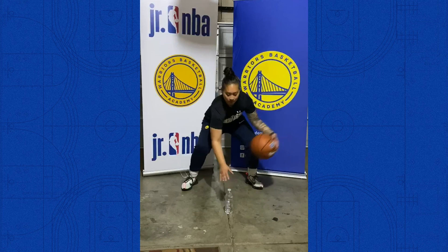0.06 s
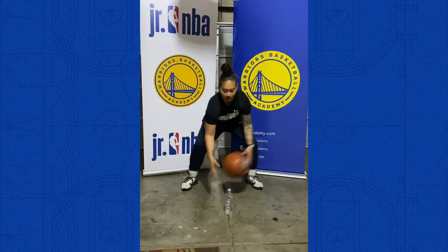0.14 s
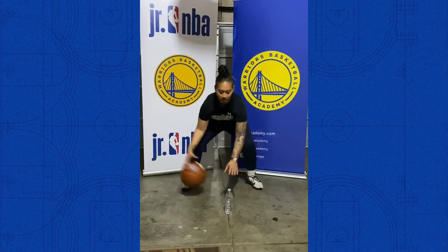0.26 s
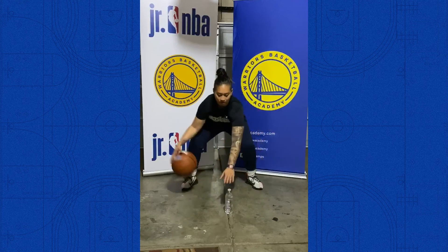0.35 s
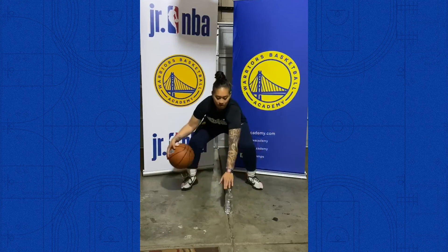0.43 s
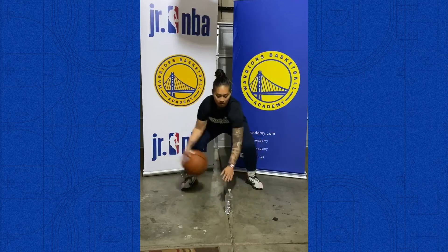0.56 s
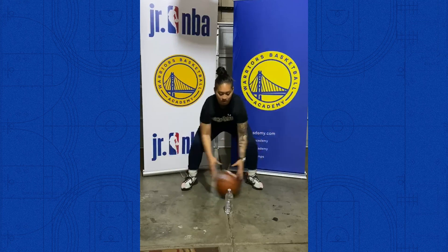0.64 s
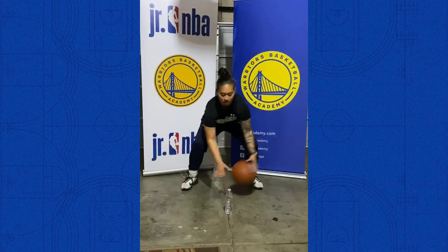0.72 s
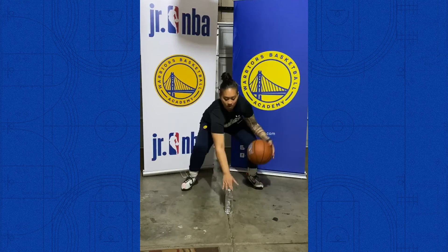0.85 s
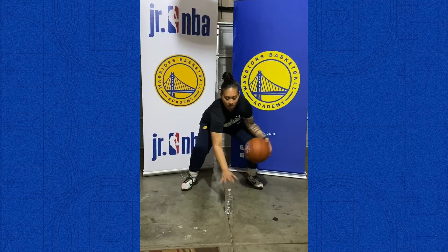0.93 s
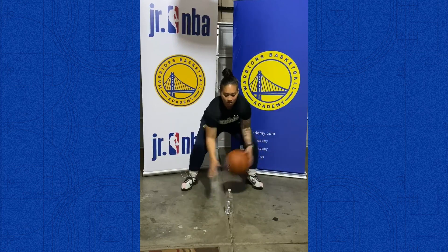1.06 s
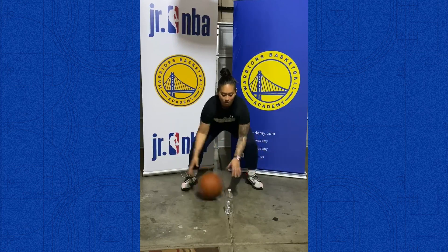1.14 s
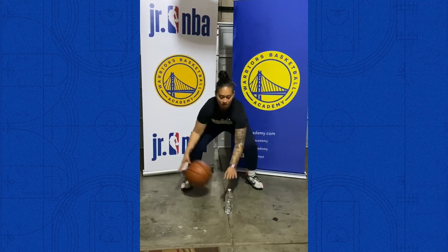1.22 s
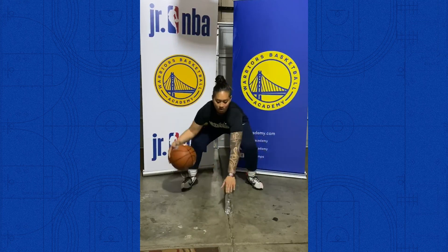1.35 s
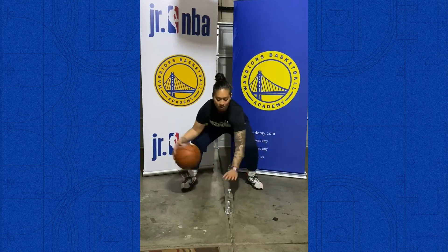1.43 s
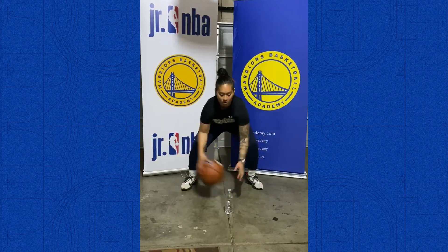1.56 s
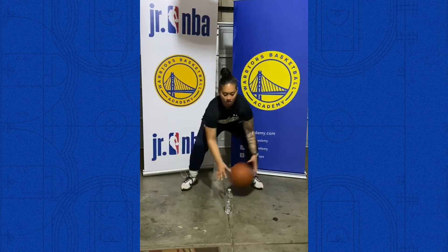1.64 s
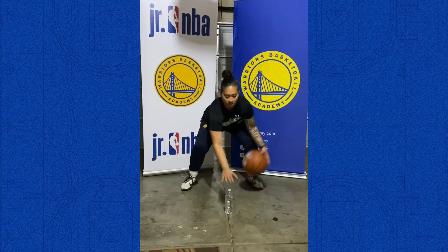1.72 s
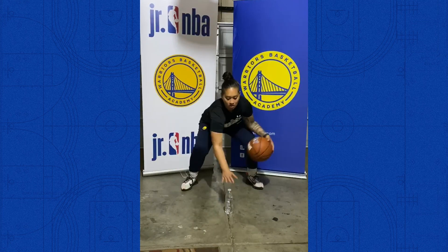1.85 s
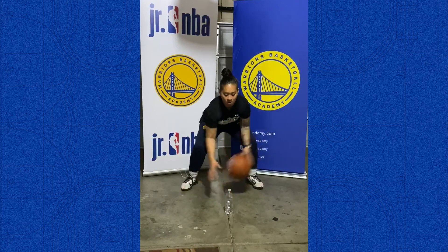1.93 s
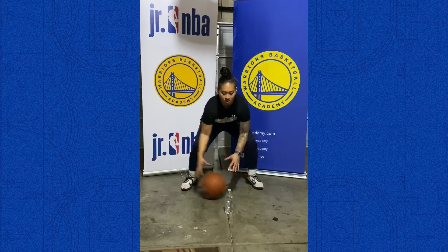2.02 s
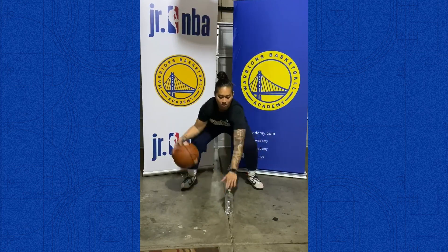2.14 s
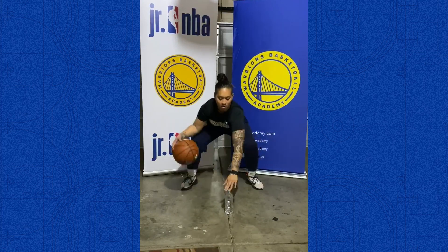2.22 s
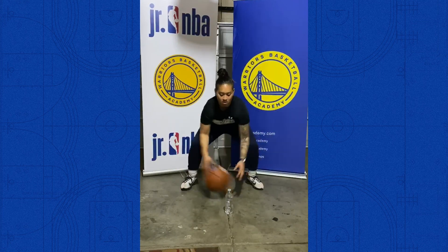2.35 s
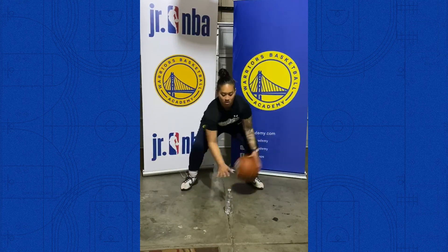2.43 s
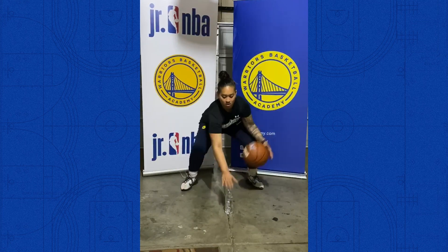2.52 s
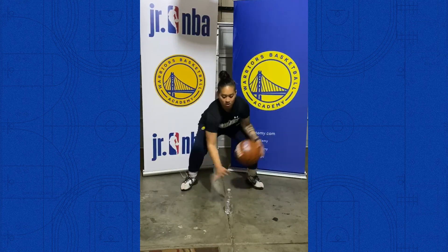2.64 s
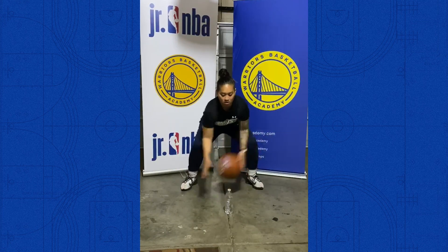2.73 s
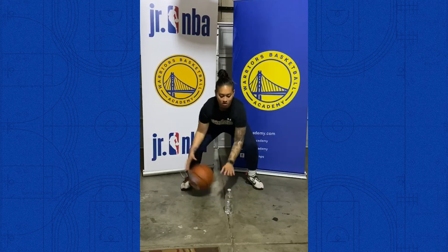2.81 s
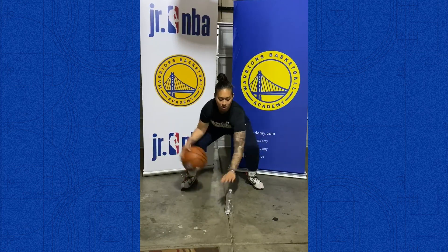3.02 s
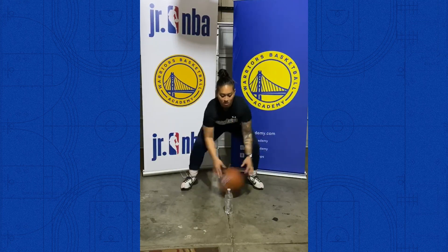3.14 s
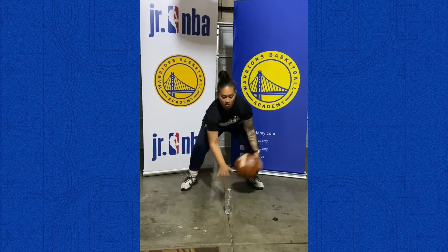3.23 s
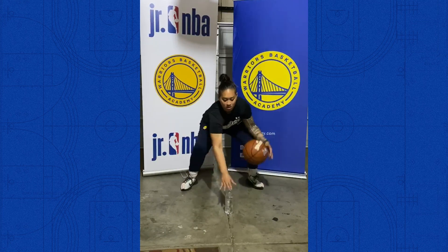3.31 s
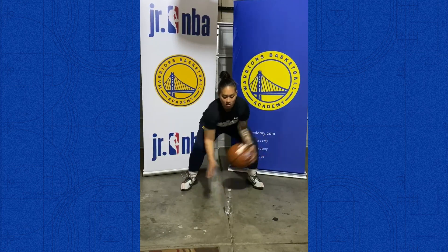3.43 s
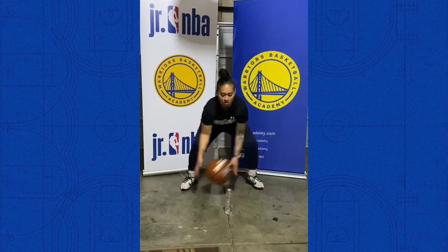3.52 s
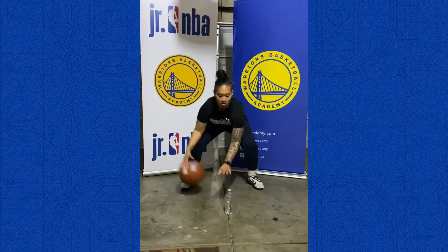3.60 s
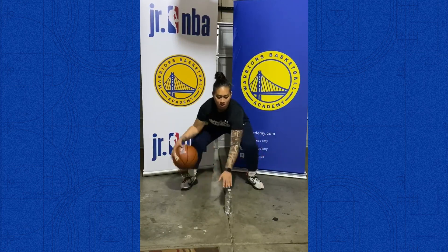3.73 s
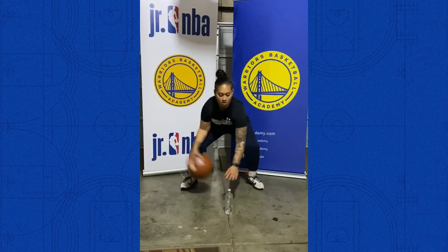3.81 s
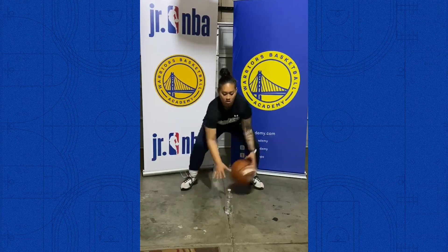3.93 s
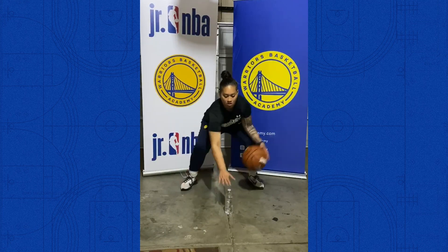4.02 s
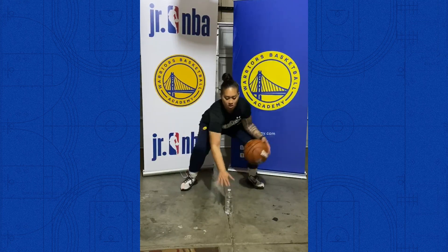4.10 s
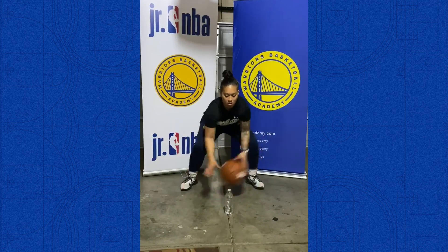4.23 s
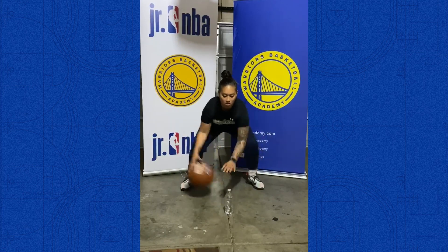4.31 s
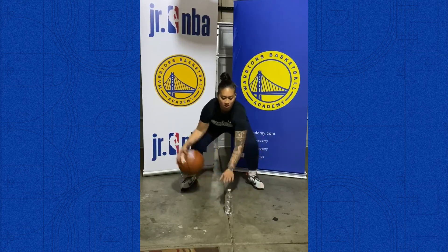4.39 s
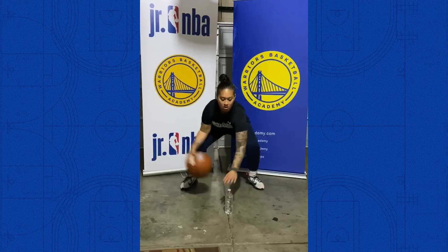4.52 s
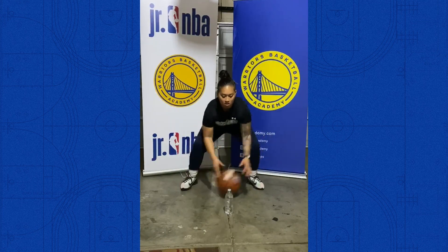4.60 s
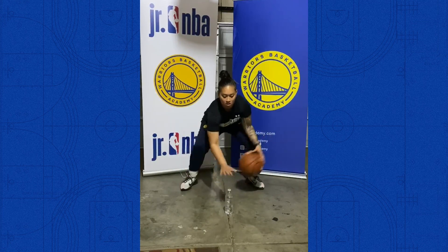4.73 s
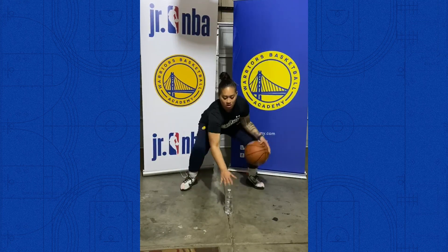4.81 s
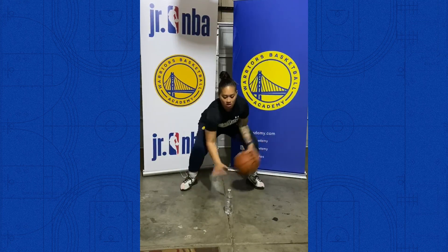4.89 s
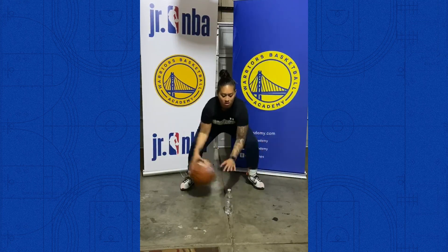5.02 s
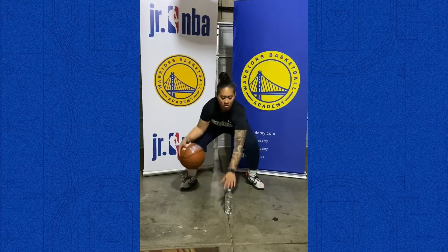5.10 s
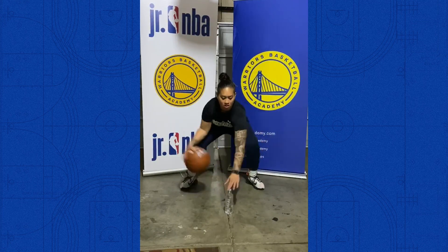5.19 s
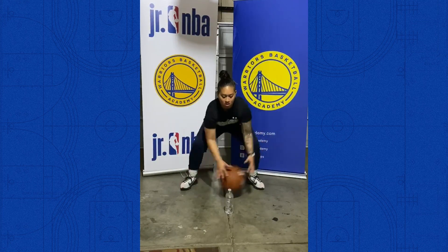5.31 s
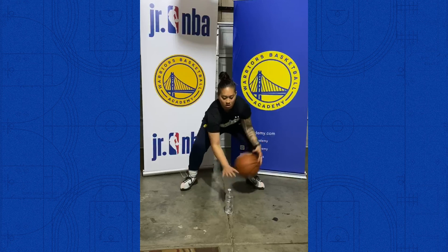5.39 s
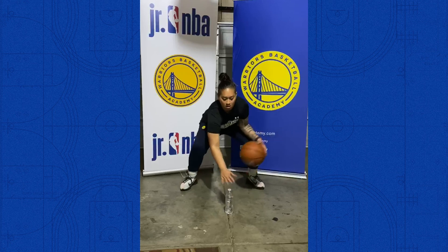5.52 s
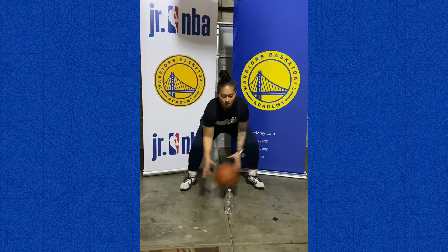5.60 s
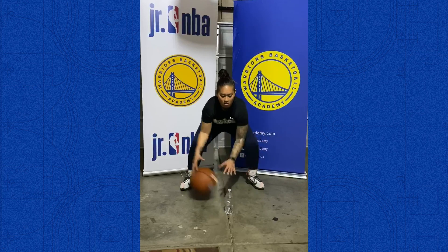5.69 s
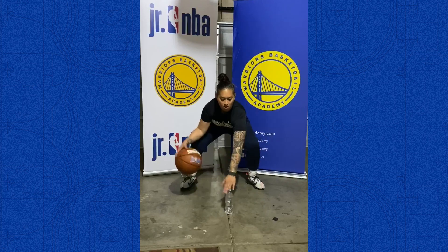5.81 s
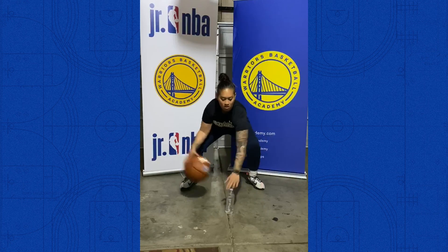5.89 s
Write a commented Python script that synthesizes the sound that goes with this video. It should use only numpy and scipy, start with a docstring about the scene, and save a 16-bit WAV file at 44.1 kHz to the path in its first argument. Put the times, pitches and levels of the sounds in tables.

```python
"""In a large hall with a concrete floor, a basketball is dribbled hard from hand to hand onto two spots in turn.
Each bounce is a crack and smack of filtered noise, a sine slap falling in pitch, and a thud of short pulses.
Decaying sines swell as the low resonances of a corner and ring as the air in the ball; noise is the hall's tail.
Palms tap the ball (noise bursts), ventilation rumbles (shaped noise) and mains hums (steady sines).
A small stereo microphone rounds off the loudest swings."""
import sys
import numpy as np
from scipy import signal
from scipy.fft import rfft, irfft, next_fast_len
from scipy.io import wavfile

SR = 44100
rng = np.random.default_rng(int(sys.argv[2]) if len(sys.argv) > 2 else 0)


def to_wav(sig):
    """Store sig (one row per channel, or 1-D mono) as 16-bit WAV at the path in sys.argv[1].

    Samples outside -1..1 are clipped; the rate is SR.
    """
    pcm = np.clip(np.atleast_2d(sig), -1, 1) * 32767
    pcm = np.round(pcm).astype(np.int16)
    wavfile.write(sys.argv[1], SR, pcm.T)  # frames by channels


N = 262395
TIME = np.arange(N) / SR
AGE = TIME[:SR]   # time since a blow, s


def from_db(db):
    """Level to amplitude: 20 dB is a factor of ten."""
    return 10 ** (np.asarray(db) / 20)


def rms_one(x):
    """Normalisation to unit root-mean-square amplitude."""
    return x / np.sqrt(np.mean(x ** 2) + 1e-20)


def at_hz(points, hz):
    """Linear interpolation of every column of a table on a log-frequency axis."""
    freqs, *columns = np.transpose(points)
    return [np.interp(np.log(hz), np.log(freqs), column) for column in columns]


def fade(t60):
    """Exponential decay: the level falls 60 dB in t60 seconds."""
    return from_db(-60 * AGE / t60)


def bump(hz, centre_hz, octaves):
    """Resonance-like weighting: a bell of height 1 on a log-frequency axis."""
    return np.exp(-(np.log2(hz / centre_hz) / octaves) ** 2)


def puff(hz, t60):
    """Heavily damped oscillation: a few swings of air rise within a cycle and die at once."""
    return np.sin(2 * np.pi * hz * AGE) * (1 - np.exp(-AGE * hz)) * fade(t60)


def band(x, low_hz, high_hz):
    """Band-pass filtering: only the range between two frequencies is kept."""
    sos = signal.butter(2, [low_hz, min(high_hz, .45 * SR)], "band", fs=SR, output="sos")
    return signal.sosfilt(sos, x)


def add(track, s, sound):
    """Superposition: a sound is mixed in from time s on."""
    start = max(round(s * SR), 0)
    part = sound[..., :max(N - start, 0)]
    track[..., start:start + part.shape[-1]] += part


# likeness of diffuse sound in the two channels: f/Hz, correlation [0-1]
LIKENESS = [(120, 1), (300, 0.99), (480, 0.57), (700, 0.12), (1000, 0.01), (1800, 0.78), (2600, 0.3),
            (4500, 1), (7000, 1), (16000, 1)]


def diffuse_bands():
    """Diffuse field: third-octave noise from all sides, its channels correlated by frequency; (Hz, noise)."""
    white = rng.standard_normal((2, 2, N))
    edges = 40 * 2 ** (np.arange(27) / 3)
    bands = []
    for k, (low, high) in enumerate(zip(edges, edges[1:])):
        hz = np.sqrt(low * high)
        mid, side = band(white[k % 2], low, high)
        alike = np.clip(at_hz(LIKENESS, hz)[0], 0, 1)
        stereo = np.sqrt(1 + alike) * mid + np.sqrt(1 - alike) * np.array([side, -side])
        bands.append((hz, rms_one(stereo)))
    return bands


# spectrum of the ventilation: f/Hz, relative spectral level/dB [per Hz]
VENT_SPECTRUM = [(30, -26), (59, -2), (90, -43), (150, -2.5), (210, -24.5), (295, -15.5), (473, -26.5),
                 (700, -34), (2900, -46), (5200, -53.5), (7300, -65), (11000, -58.5), (16000, -77)]
# steady mains hum: f/Hz, level/dB [rms]
MAINS_HUM = [(60, -40.5), (120, -44.5)]


def ventilation(air_db):
    """Broadband flow noise: steady air rumble, with a mains hum of pure tones."""
    # the power in a third-octave band grows with its width, hence with frequency
    air = sum(from_db(at_hz(VENT_SPECTRUM, hz)[0]) * np.sqrt(hz) * noise for hz, noise in diffuse_bands())
    hum = np.zeros(N)
    for hz, db in MAINS_HUM:
        hum += from_db(db) * np.sqrt(2) * np.sin(2 * np.pi * (hz * TIME + rng.random()))
    return from_db(air_db) * rms_one(air) + hum


# bounces, on the two spots in turn; levels are relative;
# direct is added to the crack (and its near echoes) and to the smack, not to the hall's tail:
#   t/s, thump level/dB, slap level/dB, slap mid-glide f/Hz, slap t60/s, crack level/dB, body level/dB,
#   knock level/dB, bite level/dB, smack level/dB, direct level/dB, flattening level/dB
BOUNCES = [(0.2431, -1.5, -0.4, 1416, 0.011, 1.5, 1, 8, 0.5, -2.5, -0.5, 4),
           (0.666, -2.5, -6.5, 1600, 0.01, -6, 1, 6, 5, 4, -2, -3),
           (1.164, -1, -2, 1540, 0.0088, 2, 2, 8.5, -0.5, 2.5, 3, -3),
           (1.6157, 1, 0, 1315, 0.014, 3, 2, 5, -5, -5.5, -7, -6),
           (2.0257, -0.9, 1.5, 1510, 0.0047, 7.5, 1, 4, -2, -1.5, 0, -12),
           (2.3886, 0, 0.5, 1185, 0.019, -6.5, 3.5, 7, 0, 1, -6.5, -4),
           (2.7956, -0.3, -0.7, 1600, 0.015, 6.5, 4, 10, 2.5, 4.5, 1.5, 1.5),
           (3.14, 1, 0.7, 1190, 0.012, -3, 2.5, 5.5, 1, -3.5, -4, -8),
           (3.576, 1.7, -1.5, 1590, 0.016, 2, 2, 12.5, 1.5, 2, -1, 2),
           (3.9039, -1.1, -0.8, 1750, 0.0063, -3.5, 5.5, 6, -1.5, -3, -6.5, -8),
           (4.278, -1.5, 1.5, 1510, 0.018, 0, 2.5, 8, -8, 3, 0, -9),
           (4.616, -1, 2.5, 1183, 0.0069, -2, 1, 2.5, -4.5, -2.5, -3.5, -1),
           (4.973, 0.5, 4.5, 1470, 0.0071, 6, 0, 3, -2, 3, 1, -13),
           (5.3, -1.5, 0.5, 1390, 0.015, -2, 0.5, 7, -8.5, 4.5, -4.5, -2),
           (5.6677, 0.4, 0.5, 1580, 0.023, -2, -2.5, 9.5, -5, 6, -2.5, -8)]
# slap and crack come back from the player and the banners: mean delay t/s, relative level/dB
NEAR_ECHOES = [(.0021, -10), (.0045, -9.5), (.0103, -13.5), (0.0172, -12.5)]


def impact(slap_level_db, glide, glide_s, crack_level_db, crack_t60, crack_low_hz, crack_high_hz, wander):
    """Contact radiation: pebbled skin cracks on concrete; the slap drops in pitch as the ball flattens."""
    out = np.zeros(N)
    for s, _, slap_db, slap_hz, slap_t60, crack_db, *_, direct_db, _ in BOUNCES:
        pitch = slap_hz * (1 + glide * (np.exp(-AGE / glide_s) - .5))
        slap = np.sin(2 * np.pi * np.cumsum(pitch) / SR) * fade(slap_t60)
        crack = rms_one(band(rng.standard_normal(SR), crack_low_hz, crack_high_hz)) * fade(crack_t60)
        hit = from_db(slap_level_db + slap_db) * slap
        hit += from_db(crack_level_db + crack_db + direct_db) * crack
        add(out, s, hit)
        for delay, db in NEAR_ECHOES:
            # the paths change as the player sways
            swayed_delay = delay * (1 + wander * rng.standard_normal())
            add(out, s + swayed_delay, from_db(db) * hit)
    return out


# the bright colours of a contact: centre, half-width of the bell
BITE_HZ, BITE_OCTAVES = 3240, 0.43
SMACK_HZ, SMACK_OCTAVES = 5600, 0.3


def smack(level_db, t60):
    """Air expulsion: air squeezed out from under the pebbled skin gives a crisp burst of noise."""
    out = np.zeros(N)
    for s, _, slap_db, *_, bite_db, smack_db, direct_db, _ in BOUNCES:
        for hz, db in ((BITE_HZ, bite_db), (SMACK_HZ, smack_db)):
            third = 2 ** (1 / 3)   # a third of an octave to either side
            burst = rms_one(band(rng.standard_normal(SR), hz / third, hz * third))
            add(out, s, from_db(level_db + slap_db / 2 + direct_db + db) * burst * fade(t60))
    return out


# the two landing spots: time for the corner's resonances to swell t/s, thump f/Hz
SPOTS = [(0.0129, 227.7), (0.015, 160.6)]
# the thump arrives directly, then in bunches from the walls of the corner; one list per spot:
#   delay t/s, thump relative level/dB, bass relative level/dB
THUMP_PATHS = [
    [(0, -11.5, -4), (0.0069, 2, 4.5), (0.0183, -0.5, -14), (0.0219, 2, -2), (0.0363, -2.5, -1.5),
     (0.049, -8.5, -2), (0.069, -16.5, -28), (0.0977, -1.5, -1), (0.1197, -2.5, -2), (.153, -11, -14)],
    [(0, -12, -17), (0.0079, -0.5, -10), (0.0203, 1.5, 4), (0.0291, 3, -12), (0.0379, -8, -3.5),
     (0.048, -6.5, -13), (0.0696, -5, -35), (.096, -9, -14), (.122, -9, -17)],
]


def thump(level_db, t60, vary_db, bass_db, bass_hz, bass_t60, hollow_db, hollow_hz, hollow_t60):
    """Volume displacement: the flattening ball shoves air aside; walls return the pulse as an uneven thud."""
    out = np.zeros(N)
    bass = from_db(bass_db) * puff(bass_hz, bass_t60)
    hollow = from_db(hollow_db) * puff(hollow_hz, hollow_t60)
    for k, (s, thump_db, _, _, _, _, body_db, *_) in enumerate(BOUNCES):
        spot = k % 2   # the ball crosses over on every bounce
        pulse = puff(SPOTS[spot][1], t60) + from_db(body_db) * hollow
        for delay, db, low_db in THUMP_PATHS[spot]:
            gain = from_db(level_db + thump_db + vary_db * rng.standard_normal())
            add(out, s + delay, gain * (from_db(db) * pulse + from_db(low_db) * bass))
    return out


# the hollow body colour of a contact, below the knock at the slap's pitch
BODY_HZ, BODY_OCTAVES = 462, 0.4
# low resonances of the corner: nominal f/Hz, t60/s, relative level/dB from spot 1, relative level/dB from spot 2
CORNER = [(62.8, 0.46, -14.5, -11), (85.6, 0.72, -26, -29), (112.5, 0.12, -1, -22), (120.34, 1, -24, -21),
          (152.9, 0.57, -12.5, -19), (178.4, 0.36, -16, -19), (217.6, 0.39, -11.5, -10),
          (242.4, 0.51, -13.5, -20), (272.2, 0.43, -8, -15.5), (301.2, 0.56, -14.5, -15.5),
          (337, 0.37, -17.5, -17), (445, 0.5, -19.5, -25), (476.3, 0.66, -21, -24),
          (540.8, 0.62, -29, -31.5)]


def boom(level_db, vary_db, detune, apart_hz):
    """Modal excitation: the thump pumps the corner's resonances, at a rate and level set by the spot."""
    out = np.zeros((2, N))
    chance = rng.standard_normal((len(BOUNCES), len(CORNER), 3))
    for k, ((s, thump_db, _, _, _, _, body_db, *_), draws) in enumerate(zip(BOUNCES, chance)):
        spot = k % 2
        swell = 1 - np.exp(-(AGE / SPOTS[spot][0]) ** 2)
        for (hz, t60, *spot_db), (louder, higher, across) in zip(CORNER, draws):
            # shorter waves differ more from bounce to bounce and from one channel to the other
            spread = (hz / apart_hz) ** 2
            mode_hz = hz * (1 + detune * spread * higher)
            phase = 2 * np.pi * mode_hz * AGE + spread * across * np.array([[1], [-1]])
            blow_db = thump_db + body_db * bump(hz, BODY_HZ, BODY_OCTAVES) + vary_db * louder
            gain = from_db(level_db + blow_db + spot_db[spot])
            add(out, s, gain * swell * fade(t60) * np.sin(phase))
    return out


# the air inside the ball: f/Hz, relative level/dB, t60/s
BALL_AIR = [(852, -38, 0.4), (990, -37, 0.41), (1295, -38, 0.79), (1490, -37, 0.45), (2100, -40, 0.65),
            (2220, -38, 0.49), (3130, -53, 0.32)]


def ball_ring(level_db, vary_db):
    """Cavity resonance: the enclosed air pings on, with its own strength and phase in each channel."""
    out = np.zeros((2, N))
    for s, _, slap_db, *_ in BOUNCES:
        for hz, db, t60 in BALL_AIR:
            gain = from_db(level_db + slap_db + db + vary_db * rng.uniform(-0.75, 1, (2, 1)))
            phase = 2 * np.pi * rng.random() + rng.standard_normal((2, 1))
            add(out, s, gain * np.sin(2 * np.pi * hz * AGE + phase) * fade(t60))
    return out


# the hall's answer to a bounce: f/Hz, early scatter relative level/dB [per octave],
#   tail relative level/dB [per octave], tail t60/s
HALL = [(50, -46, -30.5, 0.82), (117, -25, -22, 0.61), (270, -35, -16, 0.91), (448, -19.5, -21, 0.75),
        (837, -16.5, -23, 0.7), (1230, -26, -25, 0.77), (1690, -48, -31, 0.78), (2130, -32, -28, 0.69),
        (3380, -25, -27.5, 0.7), (4430, -35, -34.5, 0.7), (5550, -45, -33, 0.66), (6940, -22, -43, 0.62),
        (10460, -63, -30, 0.48), (15300, -42, -43.5, 0.24)]


def hall_decay(hz, early_t60, build_s, build_cycles):
    """Double-slope decay: a quick scatter, then the tail of a third-octave band; lows build up later."""
    early_db, tail_db, t60 = at_hz(HALL, hz)
    decay = np.hypot(from_db(early_db) * fade(early_t60), from_db(tail_db) * fade(t60))
    build_up = 1 - np.exp(-AGE / (build_s + build_cycles / hz))
    return decay * build_up / np.sqrt(3)   # a third of an octave's power


def hall(knock_octaves, grain, grain_t60, grain_apart, clump_db, clump_s, colour_t60, late_colour):
    """Reverberation: each bounce fills the hall with its own colour, which evens out as the tail dies."""
    bands = []
    for hz, noise in diffuse_bands():
        bands.append((hz, noise, hall_decay(hz, early_t60=0.11, build_s=0.0027, build_cycles=0.67)))
    out, fresh = np.zeros((2, N)), fade(colour_t60)
    for s, thump_db, slap_db, slap_hz, _, crack_db, body_db, knock_db, bite_db, smack_db, *_ in BOUNCES:
        start = rng.integers(N - SR)
        tails = np.zeros((2, 2, SR))   # below and above 1 kHz
        blow = [(350, thump_db), (900, slap_db), (2000, slap_db), (7500, crack_db)]
        for hz, noise, decay in bands:
            blow_db, = at_hz(blow, hz)
            colour_db = knock_db * bump(hz, slap_hz, knock_octaves)
            colour_db += bite_db * bump(hz, BITE_HZ, BITE_OCTAVES)
            colour_db += body_db * bump(hz, BODY_HZ, BODY_OCTAVES)
            colour_db += smack_db * bump(hz, SMACK_HZ, SMACK_OCTAVES)
            early = from_db(blow_db + colour_db)
            late = from_db(blow_db + late_colour * colour_db)
            gain = late + (early - late) * fresh
            tails[int(hz > 1000)] += gain * decay * noise[:, start:start + SR]
        # the pebbled skin lands within 7 ms: one sharp contact, then a grainy one
        pebbles = rng.standard_normal(SR) + grain_apart * rng.standard_normal((2, SR))
        pebbles = (pebbles * fade(grain_t60))[:, AGE < .007]
        contact = np.c_[np.ones(2), grain * pebbles / np.linalg.norm(pebbles[0])] / np.hypot(1, grain)
        # reflections come in bunches
        clump_curve = np.interp(AGE / clump_s, np.arange(SR), rng.standard_normal(SR))
        clumps = rms_one(from_db(clump_db * clump_curve))
        treble = signal.oaconvolve(tails[1] * clumps, contact, axes=1)[:, :SR]
        add(out, s, tails[0] + treble)
    return out


def flattening(level_db, start_ratio, fall_octaves_per_s, peak_s, width_s, vary):
    """Widening contact ring: as the ball flattens, a short knock swells and falls in pitch."""
    out = np.zeros(N)
    for s, _, slap_db, slap_hz, *_, flatten_db in BOUNCES:
        late, higher = vary * rng.standard_normal(2)
        pitch = slap_hz * start_ratio * (1 + higher) * 2 ** (-fall_octaves_per_s * AGE)
        swell = np.exp(-((AGE - peak_s * (1 + late)) / width_s) ** 2)
        knock = swell * np.sin(2 * np.pi * np.cumsum(pitch) / SR)
        add(out, s, from_db(level_db + slap_db + flatten_db) * knock)
    return out


# palms meet the ball: t/s, level/dB [of the noise at the onset, before its fade]
PALMS = [(3.4153, -39.5), (4.098, -41), (4.164, -37.5), (4.8704, -40)]


def palms(low_hz, high_hz, t60, room_db, room_t60):
    """Soft impact: a light pat of skin on rubber, with a little of the hall's decay after it."""
    out = np.zeros(N)
    for s, db in PALMS:
        pat = rms_one(band(rng.standard_normal(SR), low_hz, high_hz))
        add(out, s, from_db(db) * pat * (fade(t60) + from_db(room_db) * fade(room_t60)))
    return out


def scene():
    """Linear superposition of every source in the hall."""
    air = ventilation(air_db=-37.5)
    hits = impact(slap_level_db=-7.0, glide=0.7, glide_s=0.0019, crack_level_db=-9.5, crack_t60=0.0024,
                  crack_low_hz=4340, crack_high_hz=12900, wander=0.056)
    hits += smack(level_db=-21.5, t60=0.011)
    hits += flattening(level_db=-13.5, start_ratio=1.35, fall_octaves_per_s=110,
                       peak_s=0.0055, width_s=0.0018, vary=0.058)
    low = boom(level_db=2.0, vary_db=2.23, detune=0.0339, apart_hz=596.6)
    low += thump(level_db=4.0, t60=0.031, vary_db=1.7, bass_db=-3.0, bass_hz=134.3, bass_t60=0.036,
                 hollow_db=-16.5, hollow_hz=486.6, hollow_t60=0.023)
    ring = ball_ring(level_db=-1.5, vary_db=7.0)
    room = hall(knock_octaves=0.31, grain=0.48, grain_t60=0.043, grain_apart=0.3,
                clump_db=1.0, clump_s=.002, colour_t60=0.8, late_colour=0.74)
    hands = palms(low_hz=700, high_hz=8050, t60=0.0045, room_db=-17.5, room_t60=0.85)
    return air + hits + low + ring + room + hands


# the right microphone port lags the left: f/Hz, phase lag [radians]
PORT_LAG = [(0, 0), (1700, 0), (2900, 1.08), (4100, 1.74), (5250, 0.5), (6550, 2.5), (7400, 3),
            (10200, 6.5), (13200, 8.5), (16000, 12.5)]


def record(dry):
    """Transduction: ports shift treble phase, rumble is cut, peaks round at full scale, the top is cut."""
    size = next_fast_len(N + SR)
    lag = np.interp(np.arange(size // 2 + 1) * SR / size, *np.transpose(PORT_LAG))
    right = irfft(rfft(dry[1], size) * np.exp(-1j * lag), size)[:N]
    heard = np.array([dry[0], right])
    heard = signal.sosfilt(signal.butter(5, 46, "high", fs=SR, output="sos"), heard)
    rounded = heard / (1 + heard ** 12) ** (1 / 12)
    return signal.sosfilt(signal.ellip(10, .1, 80, 15900, fs=SR, output="sos"), rounded)


dry = scene()
out = record(dry)
to_wav(out)
```